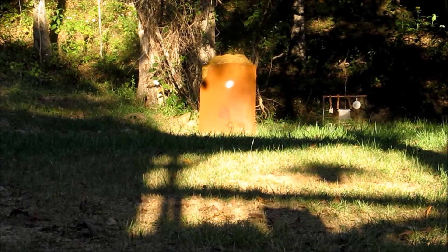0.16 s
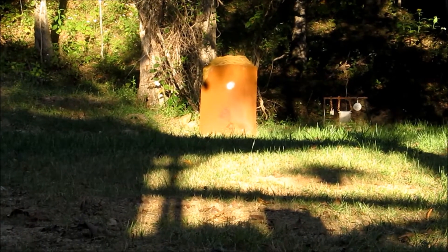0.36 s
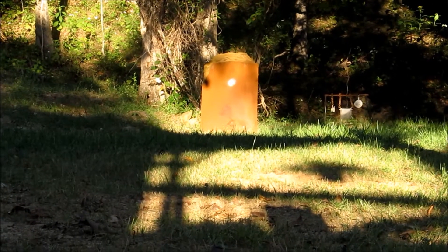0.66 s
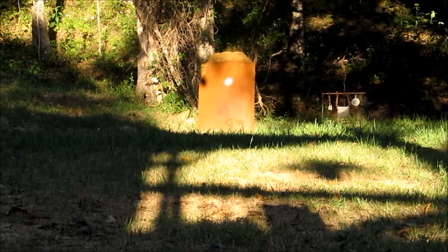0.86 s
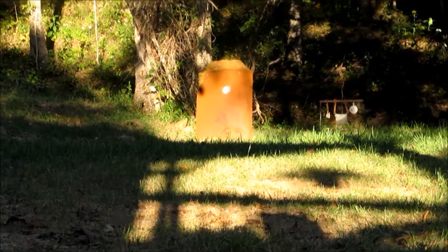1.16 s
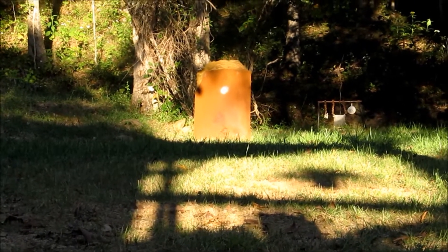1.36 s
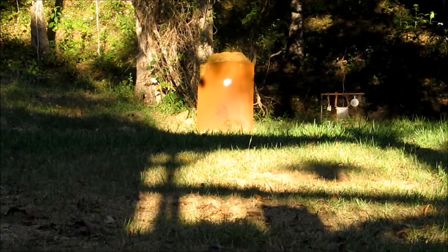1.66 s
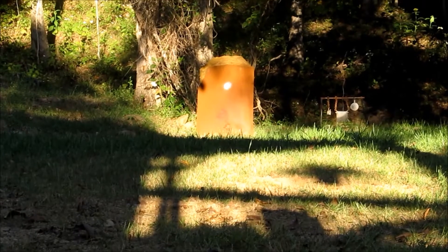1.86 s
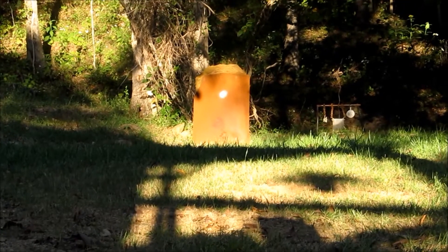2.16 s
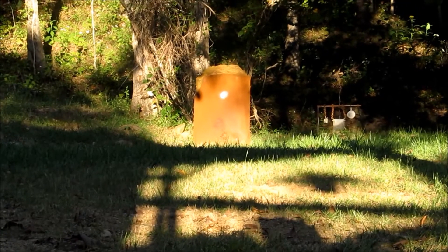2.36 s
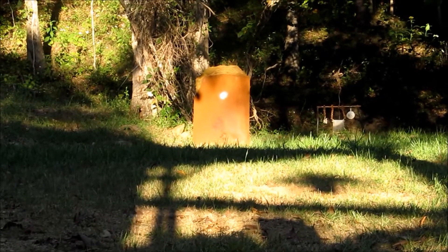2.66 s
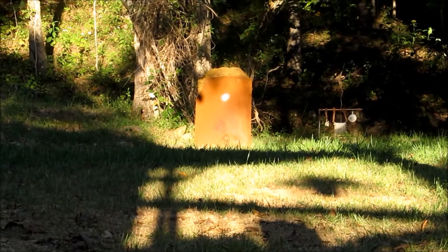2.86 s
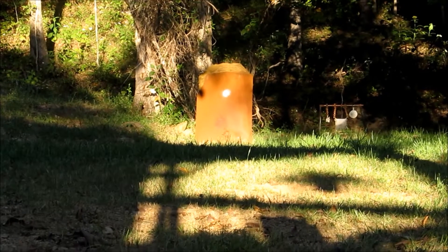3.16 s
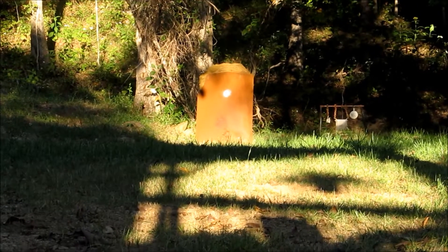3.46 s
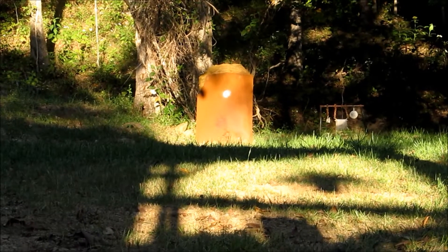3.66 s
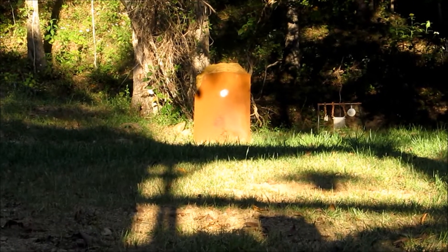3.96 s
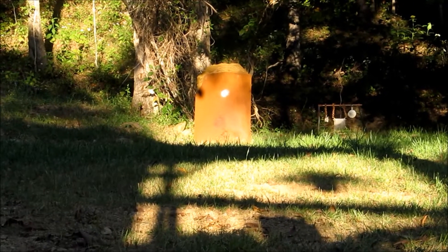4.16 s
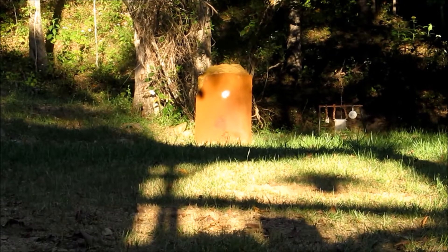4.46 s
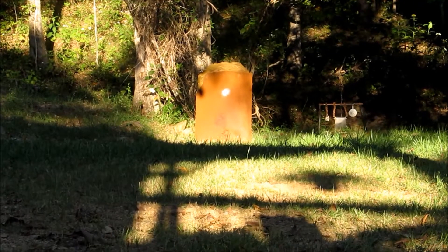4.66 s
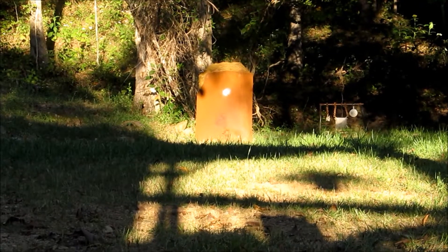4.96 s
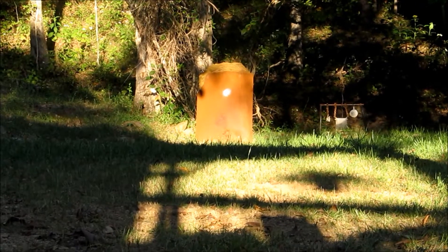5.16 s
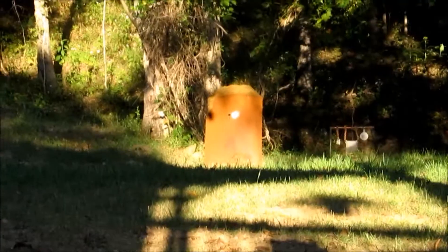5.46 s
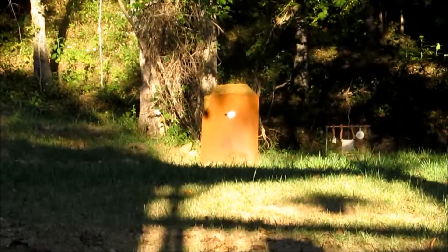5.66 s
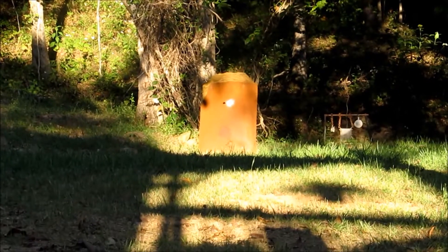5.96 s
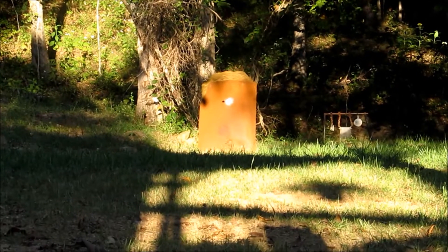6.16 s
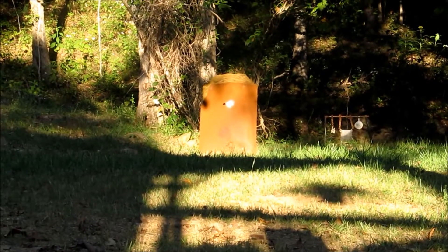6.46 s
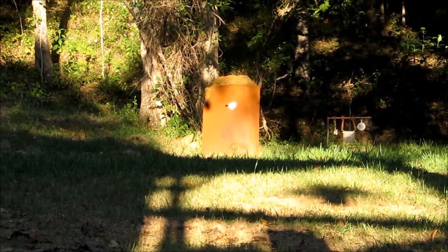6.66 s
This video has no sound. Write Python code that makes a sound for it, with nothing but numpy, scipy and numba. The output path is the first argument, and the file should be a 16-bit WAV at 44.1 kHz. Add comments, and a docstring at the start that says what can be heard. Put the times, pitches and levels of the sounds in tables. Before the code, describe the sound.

A near cricket gives quick triple-pulse chirps about three times a second over a fainter chorus, airy hiss and low hum. Close by, a crossbow stock is knocked, a catch snaps with a hard metallic click, and after a wait the bow fires: crack, slam, rattle and target thud. The insects dip after the loudest blows and swell back. Outdoor yard, close microphone, faint echoes from boards and trees.

```python
"""A crossbow is readied and fired in a yard full of crickets.
Crickets sing throughout as gliding tones, over coloured noise for air, woods and hiss, a whirr and a hum.
The stock is bumped (damped modes and scuffing noise) and a catch snaps (a noise crack and damped modes).
Then the latch lets go, the string slams home, parts rattle and the bolt hits a target: noise bursts and modes.
A limiter ducks the insects after the loudest blows and lets them swell back."""
import sys
import numpy as np
from scipy import signal
from scipy.fft import rfft, irfft
from scipy.io import wavfile
from numba import njit

SR = 44100
rng = np.random.default_rng(int(sys.argv[2]) if len(sys.argv) > 2 else 0)


def store_pcm(level_fs):
    """Save levels as 16-bit WAV."""
    pcm = np.round(np.clip(level_fs, -1, 1) * 32767).astype(np.int16)
    wavfile.write(sys.argv[1], SR, np.atleast_2d(pcm).T)


N = 300762  # length [samples]

# Chirps of the near cricket: (centre of the last stroke [s], softness of the first stroke re the last [dB])
CHIRP_TIMES = [(.263, -3), (.588, -4.5), (.896, -14), (1.183, -12), (1.492, -8), (1.777, -13), (2.057, -7),
               (2.344, -25), (2.642, -18), (2.95, -7), (3.230, -7), (3.535, -14), (3.825, -12), (4.119, -5),
               (4.415, -10), (4.719, -1.5), (5.021, -10), (5.31, -10), (5.620, -12), (5.994, -12),
               (6.316, -18), (6.651, -9)]
# Interchannel coherence of the open air: (frequency [Hz], left-right likeness [-1 to 1])
AIR_COHERENCE = [(60, 1), (250, 0.65), (640, 0.14), (1400, 0.2), (3100, 0.3), (7000, -0.044),
                 (15000, 0.066)]
# Balance of the shot and the stock: (frequency [Hz], left minus right [dB])
SHOT_BALANCE = [(60, -2), (110, 1.5), (200, -4.5), (380, 5.5), (700, 8), (1290, 1.5), (2380, 1.5),
                (4400, -0.5), (8120, -2), (15000, -1.5)]


def amp(db):
    """Level definition: decibels to an amplitude ratio."""
    return 10 ** (np.asarray(db) / 20)


def evened(x):
    """Normalization by effective value: scale to an rms of 1."""
    return x / np.sqrt(np.mean(x ** 2) + 1e-20)


def read(points, hz):
    """Logarithmic frequency scale: interpolate a table of (frequency [Hz], value) along it."""
    f, value = np.transpose(points)
    return np.interp(np.log(hz + 1), np.log(f + 1), value)


def add(mix, s, sound):
    """Linear superposition: add a sound to the mix, starting at s seconds."""
    part = mix[:, max(round(s * SR), 0):][:, :sound.shape[1]]
    part += sound[:, :part.shape[1]]


def panned(db):
    """Interchannel level difference: left and right gains that differ by db."""
    return amp(np.array([np.atleast_1d(db), -np.atleast_1d(db)]) / 2)


def dying(t, t60):
    """Exponential decay: the amplitude falls by 60 dB in t60 seconds."""
    return np.exp(-np.log(1000) * t / t60)


def noise(spectrum, same, size, side=None):
    """Partially coherent noise: shared and independent parts are mixed by frequency, with a joint rms of 1."""
    hz = np.fft.rfftfreq(size, 1 / SR)
    shared, independent = rfft(rng.standard_normal((2, size)))
    coherence = np.clip(read(same, hz), -1, 1)
    right = coherence * shared + np.sqrt(1 - coherence ** 2) * independent
    spectra = np.array([shared, right]) * amp(read(spectrum, hz))
    if side:
        spectra = spectra * panned(read(side, hz))
    return evened(irfft(spectra, size))


def burst(spectrum, t60, hold=0, rise=0.000088, side=SHOT_BALANCE):
    """Broadband impact noise: it rises, holds while the parts chatter, and decays; times in s, 0.25 s in all."""
    # coherence of the bow's noise: (frequency [Hz], left-right likeness [-1 to 1])
    bow_coherence = [(60, 0.8), (300, 0.76), (700, .75), (1400, 0.18), (3100, 0.16), (7000, 0.61),
                     (15000, 0)]
    t = np.arange(SR // 4) / SR
    onset = 1 - np.exp(-t / rise)
    decay = dying(np.maximum(t - hold, 0), t60)
    return noise(spectrum, bow_coherence, len(t), side) * onset * decay


def ring(modes, lag, size=SR, side=SHOT_BALANCE, hold=0, rise=.00005, low_hz=110):
    """Modal superposition: damped modes of alternating sign, driven for hold seconds, lag seconds late on the left."""
    t = np.maximum(np.arange(size) / SR - np.array([[lag], [0]]), 0)
    free = np.maximum(t - hold, 0)
    motion = 0
    for k, (hz, db, t60) in enumerate(modes):
        gain = (-1) ** k * amp(db) * panned(read(side, hz))
        motion = motion + gain * dying(free, t60) * np.sin(2 * np.pi * hz * t)
    motion = motion * (1 - np.exp(-t / rise))
    # small parts radiate little deep bass
    radiation = signal.butter(2, low_hz, "high", fs=SR, output="sos")
    return signal.sosfilt(radiation, motion)


def drift(rate):
    """Random fluctuation of rms 1: straight lines between random values, rate values a second."""
    knots = rng.standard_normal(int(N / SR * rate) + 2)
    return evened(np.interp(np.arange(N) / SR * rate, np.arange(len(knots)), knots))


def yard(x):
    """Diffuse scattering from trees and porch: a thin noise tail with a decay time for each frequency."""
    # (frequency [Hz], decay time t60 [s])
    yard_decay = [(100, 0.56), (600, 0.51), (2000, .24), (6000, .2), (15000, 0.32)]
    hz, t, z = signal.stft(rng.standard_normal((2, SR * 3 // 4)), SR, nperseg=256)
    decay = dying(t, read(yard_decay, hz)[:, None]) * (t > .004)
    tail = signal.istft(z * decay, SR, nperseg=256)[1]
    return signal.fftconvolve(x, tail / np.linalg.norm(tail[0]), axes=1)[:, :N]


def porch(x, t60=.075):
    """Early reflection: dense echoes from nearby boards, duller than the blow."""
    t = np.arange(SR // 8) / SR
    boards = [(100, -0.5), (1500, 2.5), (4000, -7.5), (14000, -12)]  # (frequency [Hz], relative level [dB])
    taps = noise(boards, AIR_COHERENCE, len(t)) * dying(t, t60) * (t > .004)
    return signal.fftconvolve(x, taps / np.linalg.norm(taps[0]), axes=1)[:, :N]


def background():
    """Noise and periodic sources: outdoor air, a whirr and breathy whine on the left, hiss, a distant machine's hum."""
    # spectra of air, fine hiss and a faint whirr, probably a lens drive: (frequency [Hz], relative level [dB])
    air_spectrum = [(20, -14), (45, -11.5), (80, -5), (135, 2.5), (190, -6), (400, -7.5), (700, -11),
                    (1500, -16.5), (2600, -19.5), (3300, -20), (6000, -41.5)]
    hiss_spectrum = [(2500, -18), (5000, -4.5), (8300, -1.5), (9500, 5), (10700, -0.5), (12500, -1),
                     (16000, -10)]
    whirr_spectrum = [(700, -18), (1120, -7), (1270, -14), (1450, -3.5), (1630, -8), (2000, 1), (2280, 0.5),
                      (2580, -4), (2850, -6.5), (3100, -11.5), (3600, -14), (5000, -35.5)]
    # the whine's pitch, gliding between these points: (time [s], pitch [Hz])
    whine_pitch = [(1.23, 2520), (1.28, 2848), (5.31, 2847), (5.5, 3006)]
    whirr_db, whine_db = -60, -69.5

    air = amp(-49.5) * noise(air_spectrum, AIR_COHERENCE, N) * panned(1) * amp(0.25 * drift(5.1))

    pitch = np.interp(np.arange(N) / SR, *np.transpose(whine_pitch))
    phase = 2 * np.pi * np.cumsum(pitch) / SR
    # two randomly modulated quadrature carriers make a narrow band of noise
    whine = evened(drift(190) * np.cos(phase) + drift(190) * np.sin(phase))
    whirr = amp(whirr_db) * noise(whirr_spectrum, AIR_COHERENCE, N)
    drive = (whirr + amp(whine_db) * whine) * panned(21)

    hiss = amp(-62.5) * noise(hiss_spectrum, AIR_COHERENCE, N)

    # the hum is the 4th and 5th harmonic of an unsteady rotation
    turns = np.cumsum(59.25 * (1 + .0015 * drift(3))) / SR
    hum = amp(-50.5) * np.sin(2 * np.pi * 4 * turns) + amp(-65.0) * np.sin(2 * np.pi * 5 * turns)
    waver = amp(.6 * drift(2))
    return air + drive + hiss + hum * waver


def wing_stroke(hz, sag_per_s=12.0, width=.006, tail_db=-14, octave_db=-30):
    """Stridulation: one scrape of the file, centred in 70 ms, a tone that holds, then sags as the wing slows."""
    t = np.arange(-.035, .035, 1 / SR)
    lateness = np.hypot(np.maximum(t - .001, 0), .006) - .006
    pitch = hz * (1 - sag_per_s * lateness)
    level = np.exp(-(t / width) ** 2) + amp(tail_db) * np.exp(-((t - .011) / 0.015) ** 2)
    # the right channel leads by 1.7 rad
    phase = 2 * np.pi * np.cumsum(pitch) / SR + np.array([[0], [1.7]])
    return level * (np.sin(phase) + amp(octave_db) * np.sin(2 * phase))


def near_cricket(pitch_hz=4920):
    """Pulse-train song: three wing strokes to a chirp, swelling quickly from a soft first one."""
    chirp_db, stroke_gap_s = -31.5, .044
    softness_kept = 0.11  # share of the softness in dB left at each next stroke
    out = np.zeros((2, N))
    for s, opening_db in CHIRP_TIMES:
        for k in range(3):
            stroke = wing_stroke(pitch_hz * (1 + 0.0016 * rng.standard_normal()))
            gain = amp(chirp_db + opening_db * softness_kept ** k) * panned(rng.normal(-1.4, 1.7))
            start = s - (2 - k) * stroke_gap_s - stroke.shape[1] / SR / 2
            add(out, start, gain * stroke)
    return out


def far_crickets(times, hz, spread_hz, scatter, count):
    """Incoherent summation: faint strokes from all sides, scattered in s around the times, blurred by trees."""
    out = np.zeros((2, N))
    for s in times:
        for late, detune, size, side in rng.standard_normal((count, 4)):
            pitch = hz + spread_hz * detune
            stroke = wing_stroke(pitch, sag_per_s=4., tail_db=-8.0, octave_db=-21.0) * panned(6 * side)
            swapped = stroke[::rng.choice([-1, 1])]  # left and right change places at random
            add(out, s + scatter * late - stroke.shape[1] / SR / 2, amp(2 * size) * swapped)
    return evened(out + 0.45 * yard(out))


def insects():
    """Chorus by superposition: a near cricket, neighbours in step, a lower group and the buzz of the woods."""
    # spectrum of the woods' buzz: (frequency [Hz], relative level [dB])
    chorus_spectrum = [(3000, -42), (3600, -10), (4000, -3.5), (4700, 1), (5300, 2), (5800, -2), (6500, 3),
                       (7400, -3), (7800, -19.5), (9000, -46)]
    # balance of the woods: (frequency [Hz], left minus right [dB])
    woods_balance = [(60, -1.5), (110, -4), (200, 7.5), (380, 13.5), (700, 7.5), (1290, 0), (2380, 9.5),
                     (4400, -3.5), (8120, -2.5), (15000, 3)]
    near = near_cricket()
    neighbour_times = [row[0] - .03 for row in CHIRP_TIMES]
    neighbours = amp(-51) * far_crickets(neighbour_times, 4620, 130, 0.065, count=20)
    # the far, lower crickets swell together at a beat of their own
    first_swell_s, swell_period_s = .24, .449
    swells = np.arange(first_swell_s, N / SR, swell_period_s)
    lower = amp(-55.5) * far_crickets(swells, 4170, 80, .07, count=36)
    flutter = amp(.4 * drift(6.5) + .6 * drift(70))
    woods = amp(-48) * noise(chorus_spectrum, AIR_COHERENCE, N, woods_balance) * flutter
    return near + amp(-15.0) * yard(near) + (neighbours + lower) * panned(-3.5) + woods


def handling():
    """Impact excitation and friction: the catch snaps and rings the frame; hands bump and scuff the stock."""
    # catch snaps: (time [s], level [dB], crack re level [dB], hardness [dB per octave], left minus right [dB])
    snaps = [(0.9381, -26.5, -5.5, 1, 4.5), (0.94, -14.5, -12, -4, 2), (2.2213, 3, 2.5, 2.5, 1.5),
             (6.3916, -19.5, -8, -3, -2.5)]
    # bumps on the stock: (time [s], level [dB])
    bumps = [(.254, -44), (.280, -40.5), (.345, -46), (0.502, -38.5), (.751, -39), (1.2349, -13.5),
             (1.241, -8.5), (1.277, -28), (2.172, -34), (3.444, -38.5), (5.553, -15.5), (6.426, -39.5)]
    # modes of the catch, short in its body and long in the frame, before hardness:
    # (frequency [Hz], level [dB], decay time t60 [s])
    catch_modes = [(639.6, -30, .03), (913, -21, .025), (1124, -17, 0.015), (1400, -10.5, 0.022),
                   (1590, -7.5, 0.024), (1865, 0, 0.017), (2290, -4, 0.018), (2830, -3.5, 0.019),
                   (3120, -9.5, 0.015), (3697, -2.5, 0.021), (4120, -5.5, 0.015), (4520, -15, 0.025),
                   (137, -51.5, 3.5), (463, -34, 0.23), (583, -49.5, 1.2), (846, -49, 0.72),
                   (1020, -42.5, 0.47), (1275, -28.5, .23), (1400, -38.5, 0.16), (3095, -49.5, 0.85),
                   (3252, -37, 0.22)]
    # modes of the stock: (frequency [Hz], level [dB], decay time t60 [s])
    stock_modes = [(180.9, -4.5, 0.11), (281, -4, 0.03), (550, -6, 0.046), (813, -19, .05), (993, -15, .04),
                   (1430, -20, 0.09)]
    # spectra of the bright crack and of the scuffing hand: (frequency [Hz], relative level [dB])
    crack_spectrum = [(60, -19), (600, -11), (2000, 0.5), (4300, 0.5), (5400, -12.5), (6700, -8),
                      (7700, -1.5), (11000, -15), (13200, -9.5), (15000, -18.5)]
    scuff_spectrum = [(25, -22), (100, -18), (200, 8), (550, 1), (1000, -6), (2000, -9.5), (4000, -18.5),
                      (7000, -20), (15000, -41.5)]
    # balance of the catch, before each snap's own: (frequency [Hz], left minus right [dB])
    snap_balance = [(200, 2), (400, 8), (700, 12.5), (1300, 1.5), (2400, -2.5), (4400, -5.5), (15000, -3)]

    out = np.zeros((2, N))
    for s, db, crack_db, hardness, side_db in snaps:
        # hardness tilts the modes above 1900 Hz
        modes = [(hz, mode_db + hardness * np.log2(max(hz / 1900, 1)), t60)
                 for hz, mode_db, t60 in catch_modes]
        ringing = ring(modes, lag=.00005, size=2 * SR, side=snap_balance)
        crack = burst(crack_spectrum, t60=.014, side=snap_balance)
        add(out, s, amp(db) * panned(side_db) * ringing)
        add(out, s, amp(db + crack_db) * panned(side_db) * crack)

    # light touches are mostly scuff: its level for a 0 dB bump [dB], its growth [dB per dB]
    scuff_db, scuff_growth = -8, 0.79
    stock = ring(stock_modes, lag=0.00015, low_hz=60)
    for s, db in bumps:
        scuff = burst(scuff_spectrum, t60=0.056, rise=0.0012)
        add(out, s, amp(db) * stock)
        add(out, s, amp(scuff_db + scuff_growth * db) * scuff)
    return out


def shot():
    """Release of elastic energy: the latch cracks, the string slams into its stops, parts rattle, the bolt lands."""
    # loose parts rattling after the shot: (time [s], level [dB])
    rattles = [(5.386, -5), (5.411, -7.5), (5.4348, -8), (5.4740, -16), (5.4805, -16), (5.5442, -28)]
    # modes of limbs and string after the release: (frequency [Hz], level [dB], decay time t60 [s])
    limb_modes = [(165, -17.5, .16), (232, -10, 0.13), (377, -0.5, 0.036), (438, -13.5, .1),
                  (657, -12.5, 0.085), (823, -14, 0.047), (1163, -10, .07), (1335, -15, 0.062),
                  (1470, -14.5, .08), (1645, -14.5, .07), (2210, -13, .06), (3820, -11, 0.063),
                  (4360, -14, 0.033), (5700, -16, .06), (142, -35.5, 2.2), (290, -46, 2.1),
                  (578, -31.5, 0.92)]
    # spectra of the blows: (frequency [Hz], relative level [dB])
    latch_spectrum = [(35, -51.5), (60, -24.5), (416, -22.5), (1650, -13.5), (2130, 1.5), (3240, -15),
                      (3900, -3.5), (5040, -16.5), (7150, -15), (8820, -18), (10900, -32.5), (14100, -26),
                      (15800, -41.5)]
    slam_spectrum = [(30, -16.5), (120, -14), (230, -12), (600, 4.5), (950, -3.5), (1400, 5), (2200, -2.5),
                     (3000, -2.5), (3900, 0.5), (5200, -6.5), (8000, -15.5), (12000, -24.5), (16000, -30)]
    clatter_spectrum = [(60, -9.5), (150, 6.5), (450, -1.5), (800, -5.5), (1600, -8), (3000, -13.5),
                        (6000, -19.5), (15000, -38)]
    tick_spectrum = [(200, -7), (1500, 9), (3000, -1), (5000, -2.5), (7800, 3), (10500, -22), (16000, -23)]
    target_spectrum = [(80, 2), (180, 5), (600, 2), (1500, -2), (3000, -10.5), (6000, -34), (15000, -40)]

    out = np.zeros((2, N))
    add(out, 5.3103, amp(13.5) * burst(latch_spectrum, t60=0.019, hold=0.0054, rise=0.00066))
    add(out, 5.3155, amp(13.0) * burst(slam_spectrum, t60=0.077, hold=0.017, rise=0.0015))
    add(out, 5.3175, amp(13.0) * ring(limb_modes, lag=.00008, size=2 * SR, hold=0.017, rise=.002))
    # the limbs swing to and fro at 40 Hz and shake the fittings on every swing
    clatter = burst(clatter_spectrum, t60=.38, rise=.004)
    swing = np.sin(2 * np.pi * 40 * np.arange(clatter.shape[1]) / SR)
    add(out, 5.3575, amp(-9.0) * clatter * amp(3 * swing))
    for s, db in rattles:
        add(out, s, amp(db) * burst(tick_spectrum, t60=0.0082))
    add(out, 5.4620, amp(-0.5) * burst(target_spectrum, t60=0.025, rise=0.0011))
    return out


def scene():
    """Direct and reflected sound: the bow with its porch and yard echoes, the insects and the background."""
    bow = handling() + shot()
    reflected = amp(-19.5) * porch(bow) + amp(-28.0) * yard(bow)
    return bow + reflected + insects() + background()


@njit
def follow(x, attack, release):
    """First-order relaxation: moves towards x by the share attack when rising, release when sinking."""
    out, state = np.zeros(len(x)), 0.
    for i in range(len(x)):
        state += (x[i] - state) * (attack if x[i] > state else release)
        out[i] = state
    return out


def record(dry, threshold_db=-8, recovery_db_per_s=17, attack=0.0004, release=0.26, window=0.00092):
    """Dynamic range limiting: fast clamp, slow recovery, clipped peaks and a band limit; time constants in s."""
    edge_hz = 15900
    r = np.exp(-1 / (window * SR))
    power = signal.lfilter([1 - r], [1, -r], (dry ** 2).mean(0))
    power_db = 10 * np.log10(power + 1e-12)
    # hold each peak level, falling at the recovery rate
    fall = np.arange(N) / SR * recovery_db_per_s
    held_db = np.maximum.accumulate(power_db + fall) - fall
    over_db = np.maximum(held_db - threshold_db, 0)
    reduction_db = follow(over_db, 1 / (attack * SR), 1 / (release * SR))
    ducked = np.clip(dry / amp(reduction_db), -1, 1)
    lowpass = signal.firwin(511, edge_hz, window=("kaiser", 9), fs=SR)
    return signal.oaconvolve(ducked, lowpass[None], "same")


dry = scene()
out = record(dry)
store_pcm(out)
```